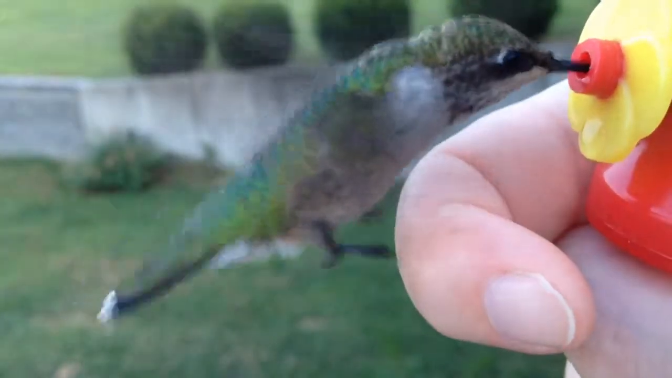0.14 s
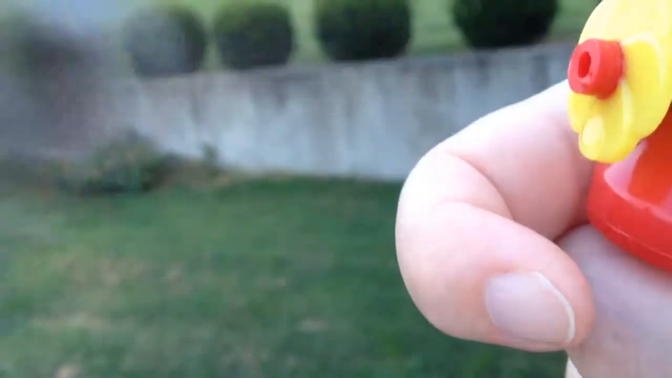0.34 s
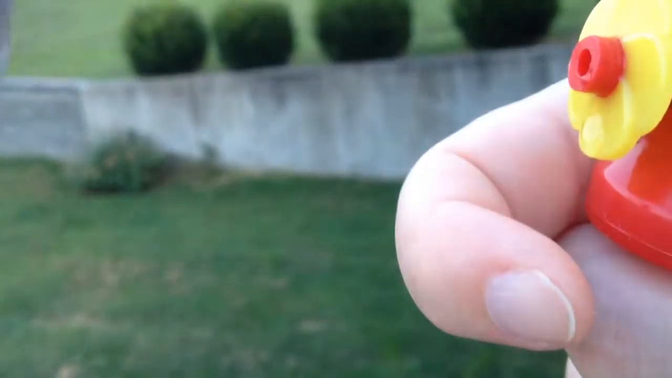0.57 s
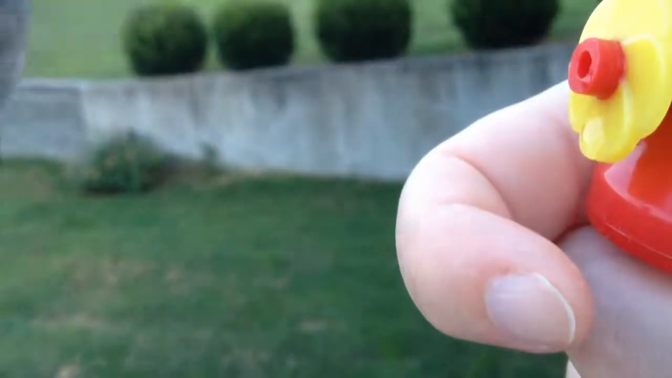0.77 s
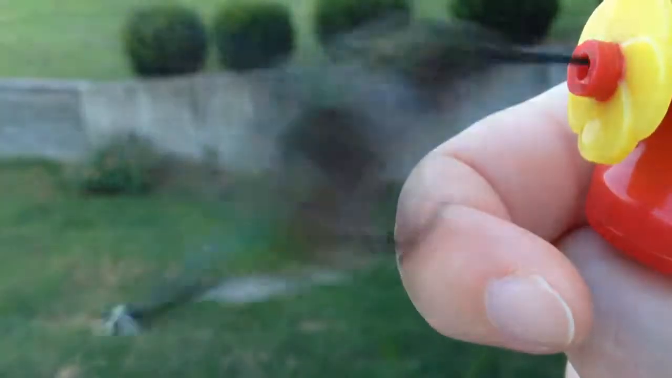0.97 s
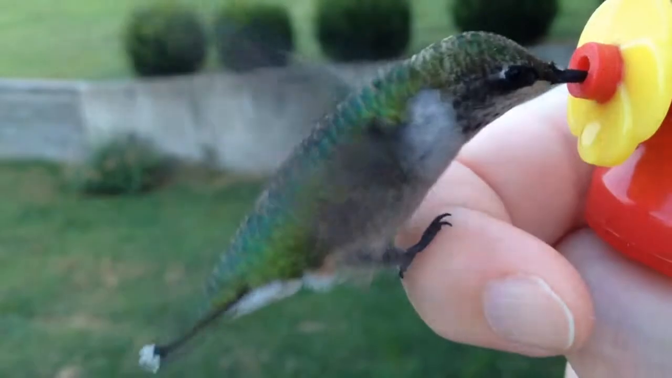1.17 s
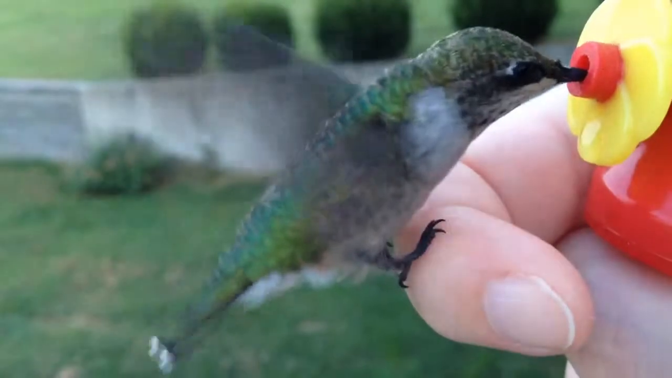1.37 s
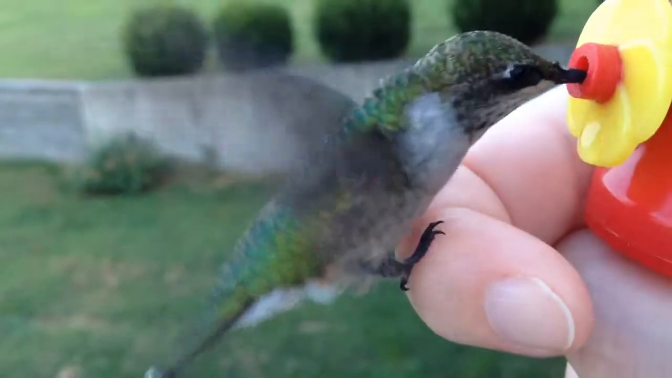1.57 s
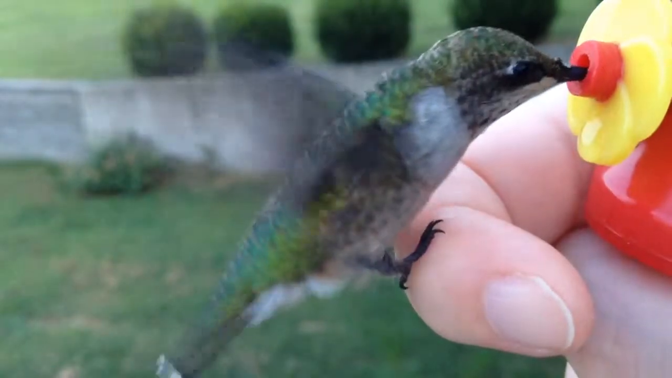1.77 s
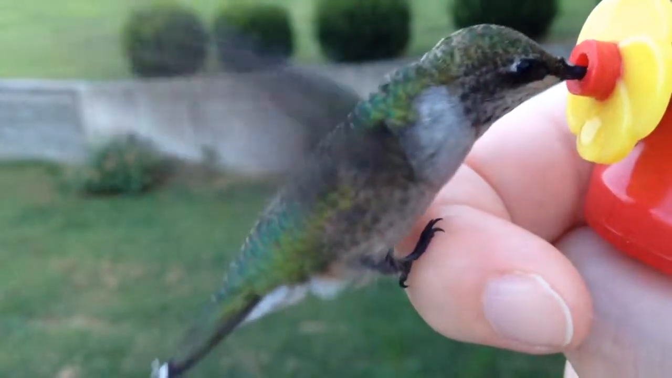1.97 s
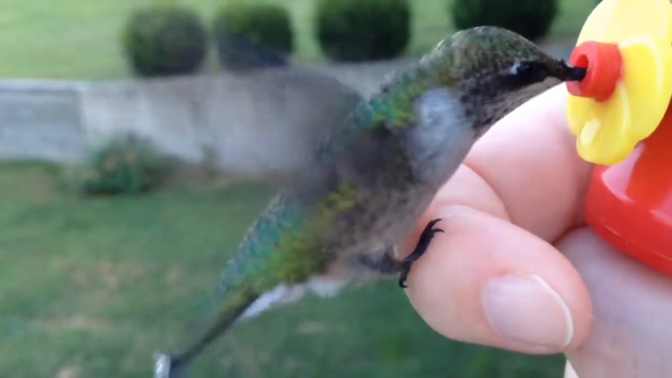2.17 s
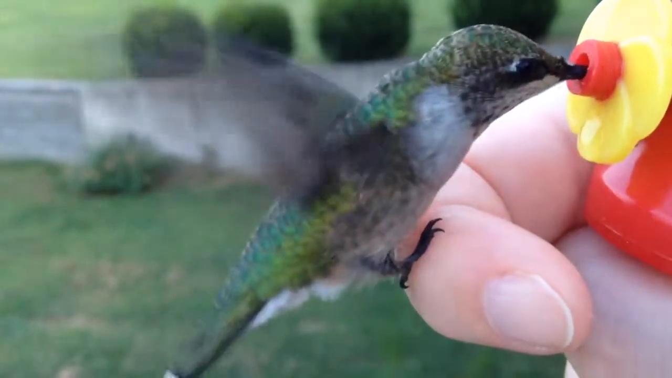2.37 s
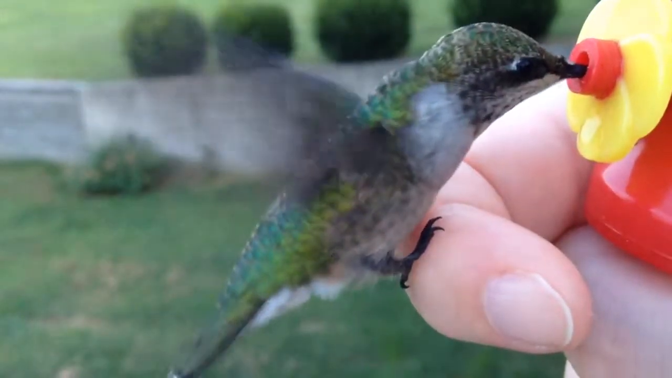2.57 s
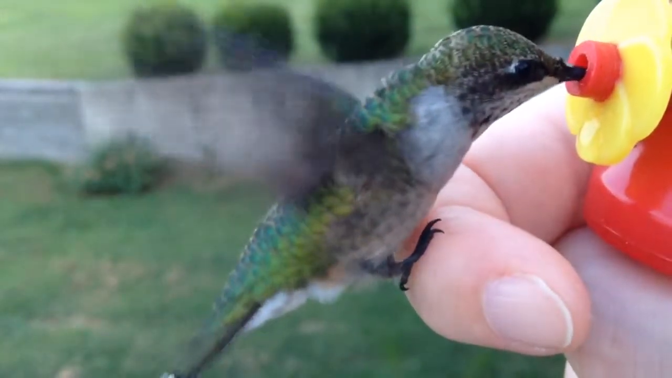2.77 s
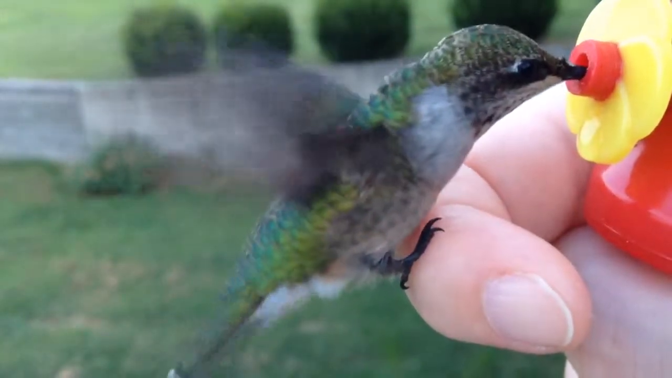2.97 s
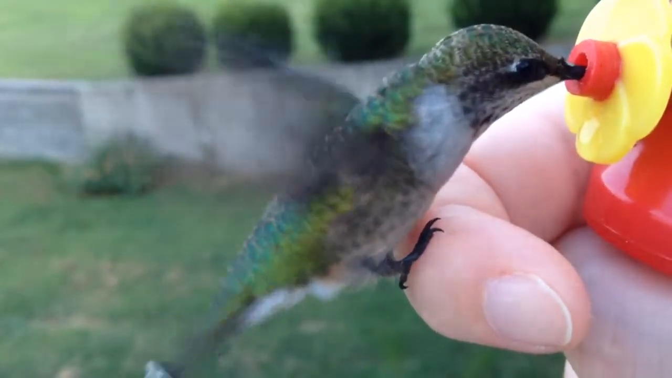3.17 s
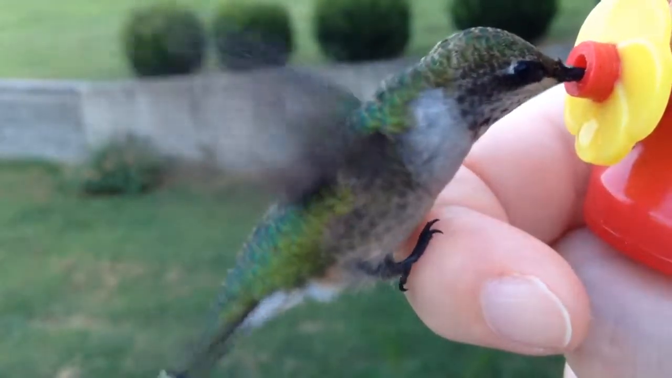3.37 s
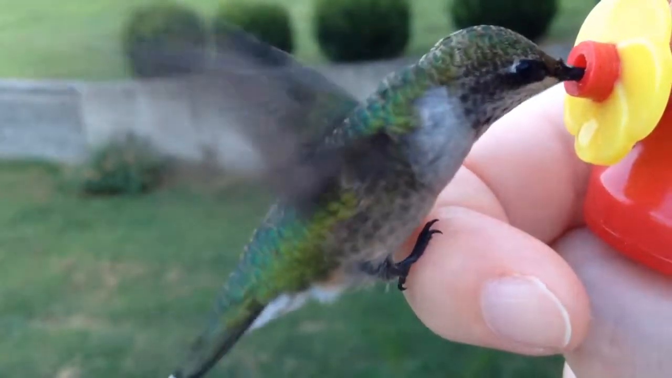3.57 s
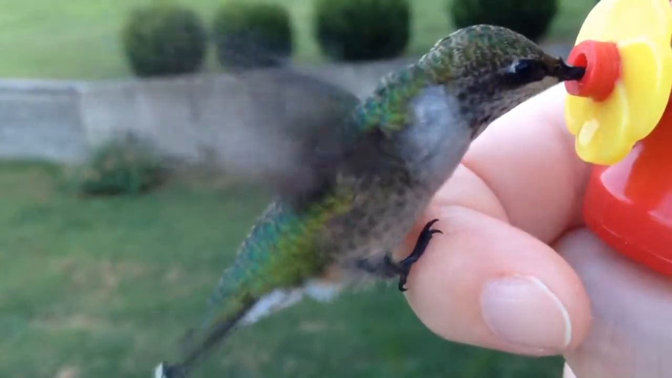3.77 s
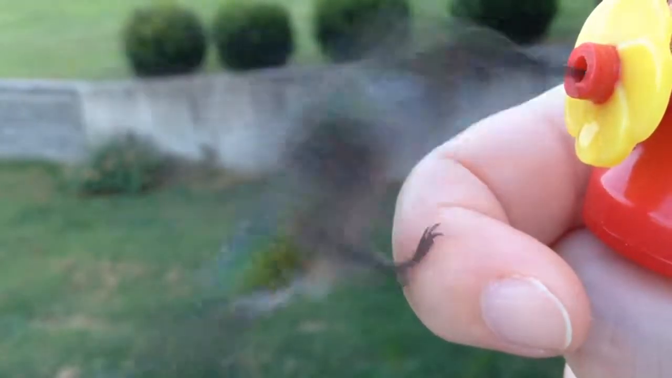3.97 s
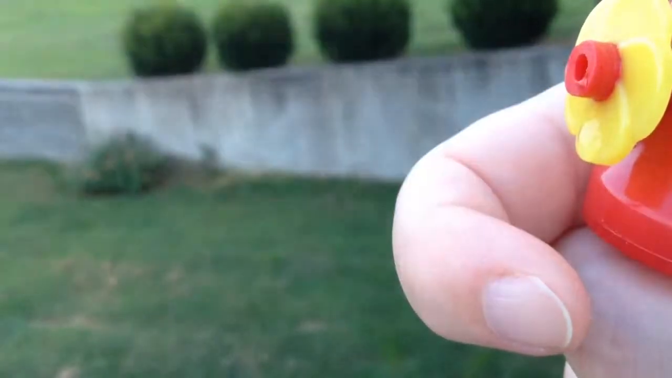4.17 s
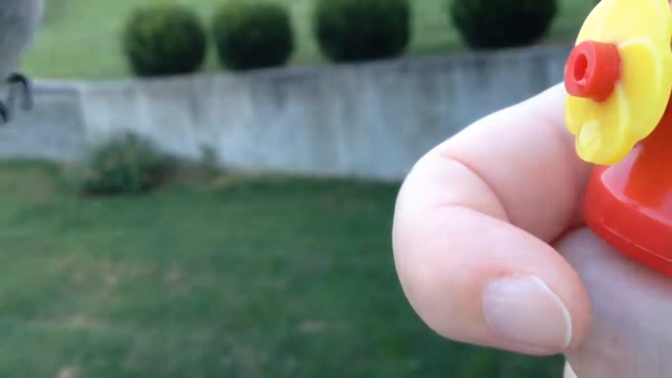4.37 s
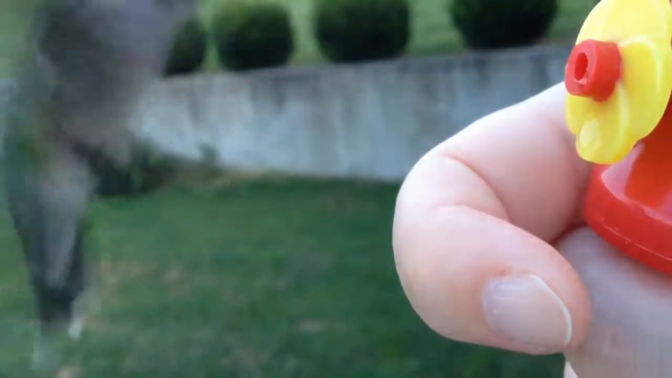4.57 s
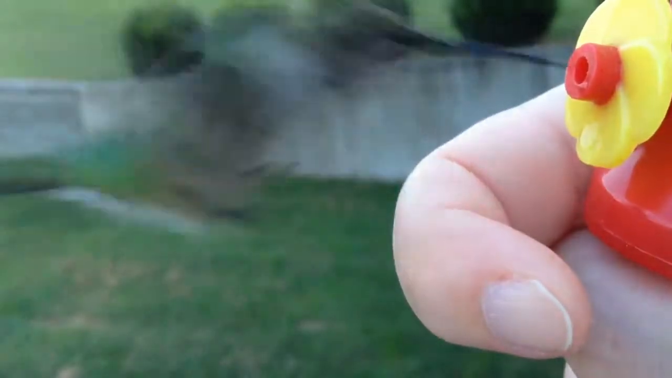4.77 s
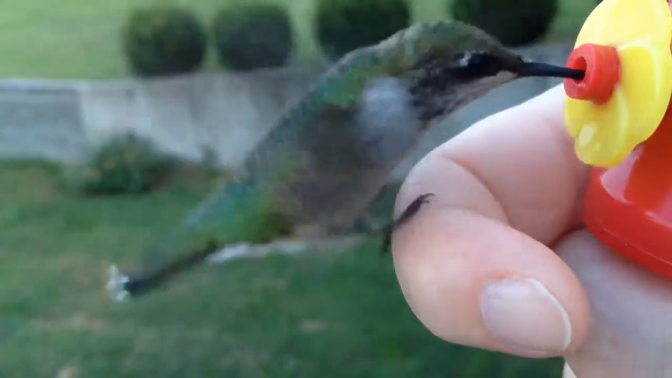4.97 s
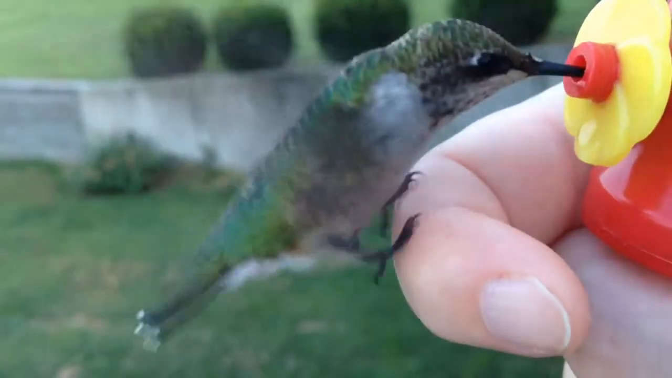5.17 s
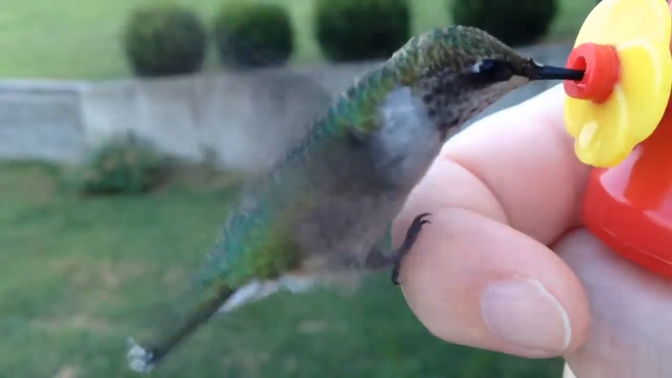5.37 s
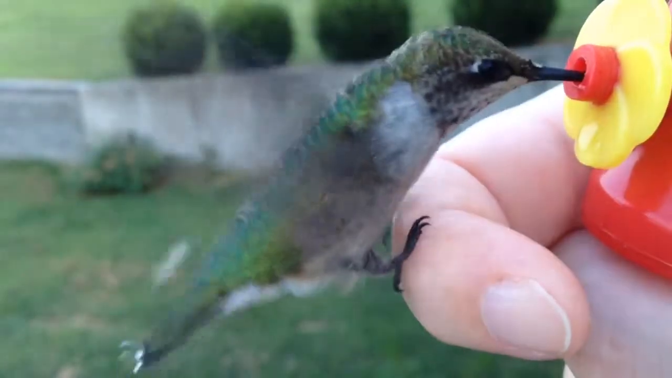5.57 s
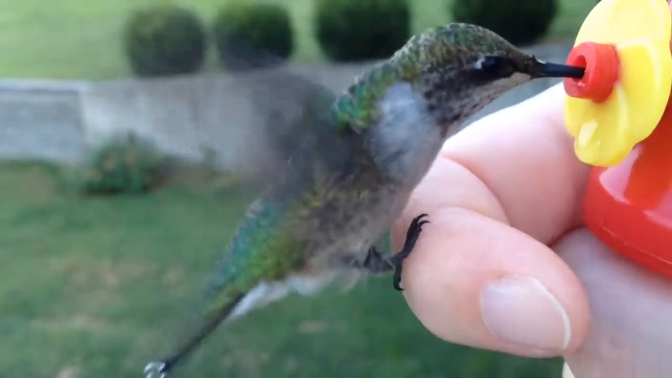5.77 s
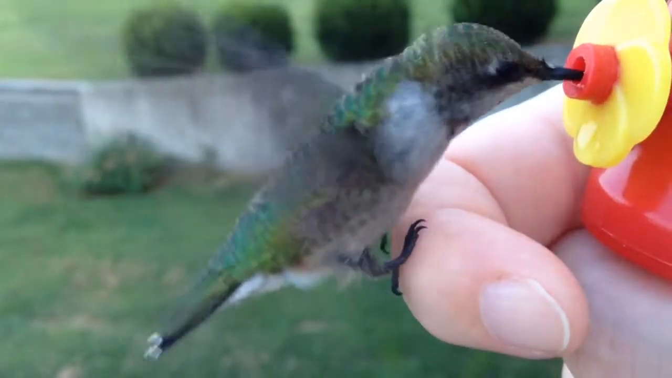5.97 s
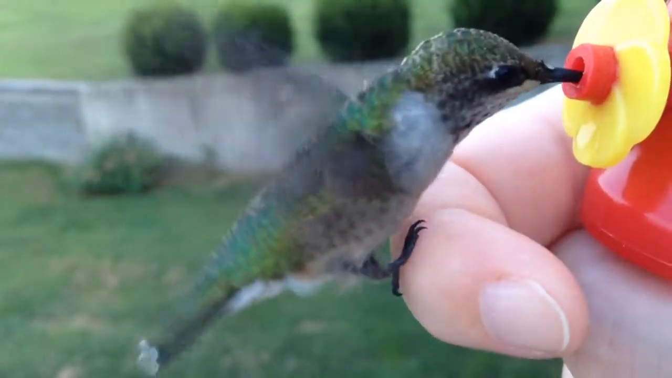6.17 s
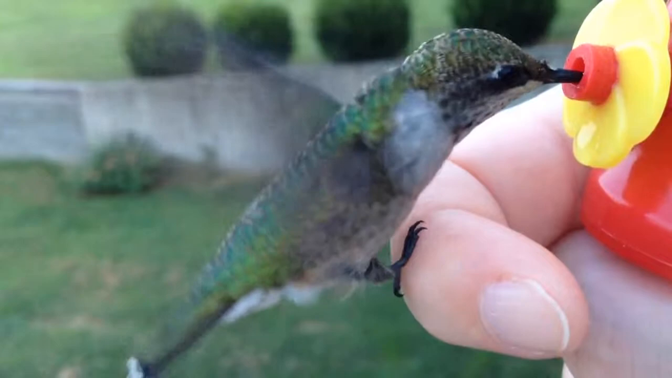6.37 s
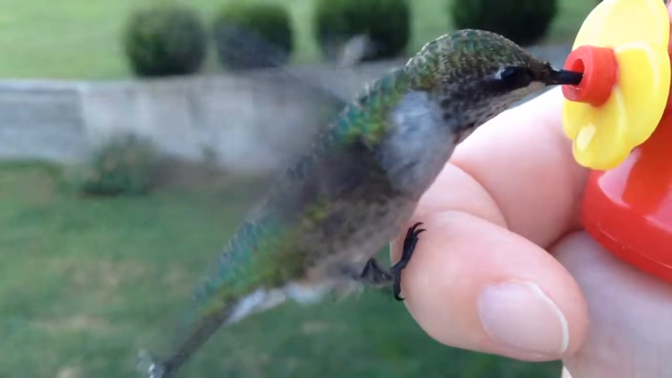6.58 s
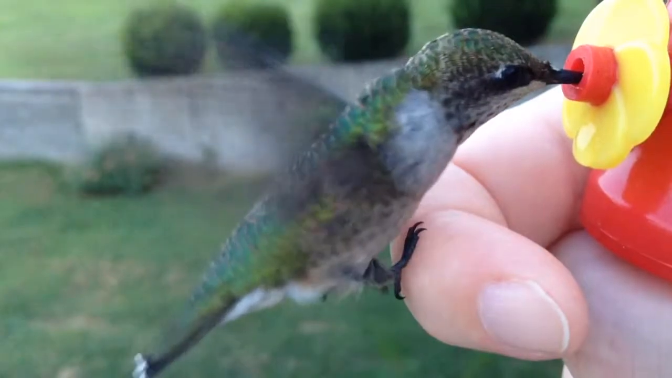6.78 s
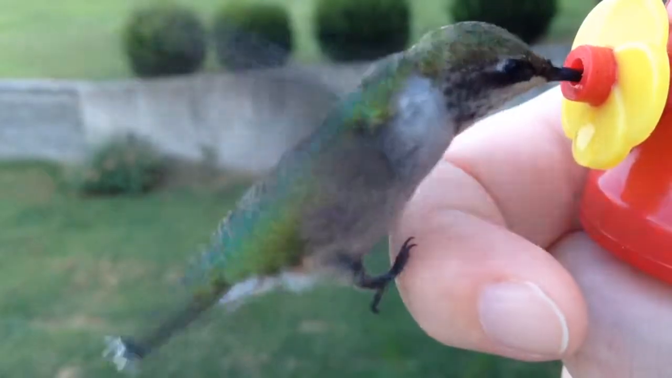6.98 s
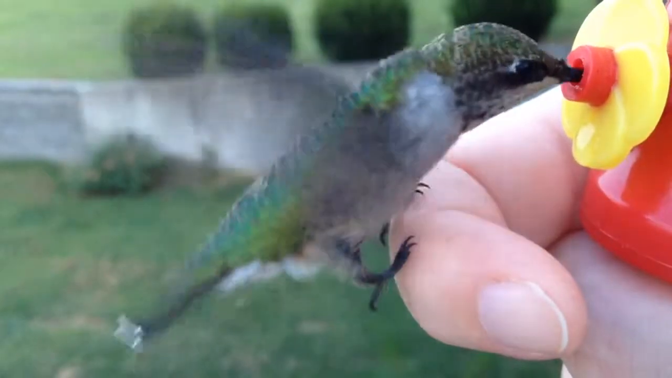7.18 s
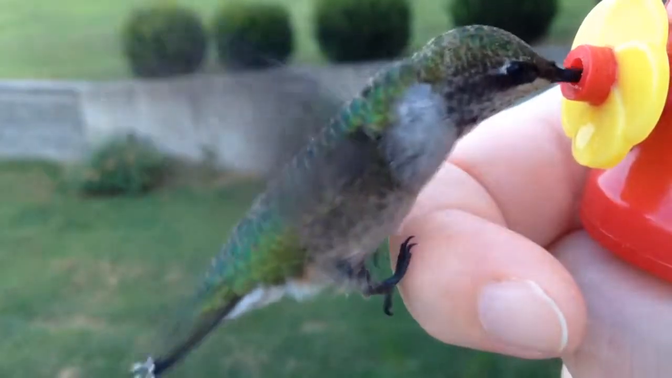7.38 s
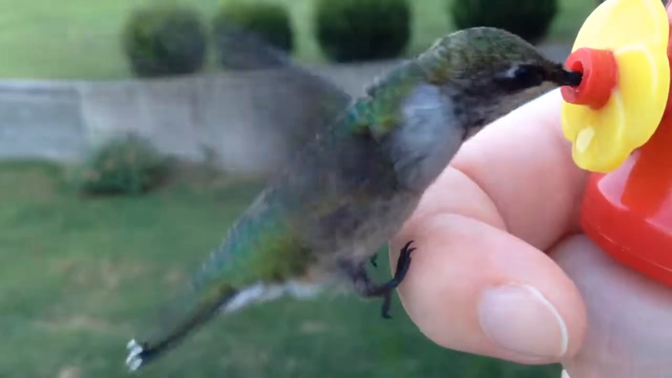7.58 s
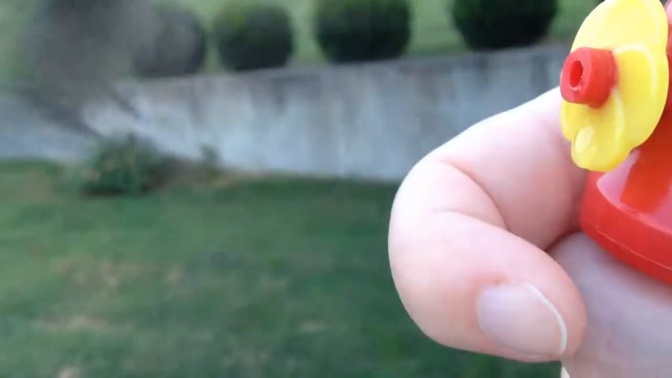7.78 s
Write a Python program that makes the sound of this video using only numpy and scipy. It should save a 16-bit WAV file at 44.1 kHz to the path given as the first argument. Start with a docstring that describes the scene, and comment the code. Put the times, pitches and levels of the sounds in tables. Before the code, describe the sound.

In a quiet garden, crickets and other insects chirr continuously: a steady rasping band and a higher one swelling about two and a half times a second. From very close, a hummingbird's wings start with a strong low hum near 55 beats a second, with puffs of air and feather rustle, surging at 0.3 and again at 1.0 seconds. From about 1.2 to 3.9 it sips, the hum reduced to a soft, uneven flutter with small surges. A light dry tick comes from the feeder at 3.8. At 4.1 the wings thrum hard as it darts off, dip, then surge back at 4.6 to 4.9 and hover until 5.3. Another soft flutter follows, restless around 7.0 to 7.2, then a departing burst at 7.75. Short falling chips with a brief echo cluster in the first 2.3 seconds and return faintly from 4.7, clearest at 6.9. A faint hollow note sounds at 5.4.

```python
"""A hummingbird hovers at a hand-held feeder, backs off, comes in and sips with its feet on a finger.
Halfway it darts off, swoops back and settles to sip again; at the very end it leaves.
Each wingbeat pushes out a pressure pulse, a puff of eddies and a rustle of feathers, heard from very close.
The hummingbirds' chips are short falling whistles with an echo; a few dry ticks come from the feeder.
Crickets and other night insects chirr throughout as pulsing bands of noise, over still air and a faint rush."""
import sys
import numpy as np
from scipy import signal
from scipy.fft import rfft, irfft
from scipy.io import wavfile

SR = 44100
rng = np.random.default_rng(int(sys.argv[2]) if len(sys.argv) > 2 else 0)


def store_wav(level_fs):
    """Save 16-bit WAV to argv[1]."""
    pcm = np.round(np.clip(np.atleast_2d(level_fs), -1, 1) * 32767)
    wavfile.write(sys.argv[1], SR, pcm.T.astype(np.int16))


N = 345744
TIME = np.arange(N) / SR  # seconds


def from_db(db):
    """Decibels to gain."""
    return 10 ** (np.asarray(db) / 20)


def rms_one(x):
    """Scale to unit rms."""
    return x / np.sqrt(np.mean(x ** 2) + 1e-20)


def in_time(rows):
    """Each column of a curve, interpolated at every sample."""
    seconds, *columns = np.transpose(rows)
    return [np.interp(TIME, seconds, column) for column in columns]


def drift(rate):
    """Smooth random wander of rms 1 that changes about rate times a second."""
    hz = np.arange(N // 2 + 1) * SR / N
    lowpass = 1 / (1 + (hz / rate) ** 4)
    return rms_one(irfft(rfft(rng.standard_normal(N)) * lowpass, N))


def noise(spectrum):
    """Noise of rms 1, its colour drawn between the spectrum's points on a log-frequency axis."""
    hz, db = np.transpose(spectrum)
    bins = np.arange(1, N // 2 + 2) * SR / N
    gain = from_db(np.interp(np.log(bins), np.log(hz), db, right=-90))
    return rms_one(irfft(rfft(rng.standard_normal(N)) * gain, N))


def resonance(x, hz, width_hz):
    """A two-pole resonance of gain 1."""
    r = np.exp(-np.pi * width_hz / SR)
    zeros = np.array([1, 0, -1]) * (1 - r * r) / 2
    poles = [1, -2 * r * np.cos(2 * np.pi * hz / SR), r * r]
    return signal.lfilter(zeros, poles, x + 1e-18)


def surges(rows):
    """A flat-topped rise in dB for each row of middle, length and height."""
    return sum(db * np.exp(-(2 * (TIME - s) / length) ** 4) for s, length, db in rows)


def during(start, end, ramp_s):
    """1 between two times, falling to 0 over a ramp on either side."""
    return np.clip(1 + np.minimum(TIME - start, end - TIME) / ramp_s, 0, 1)


# Colour of the air shed by the wings. Each row: frequency in Hz, relative density in dB per Hz.
EDDY_COLOUR = [(60, -33), (110, 0), (200, 6), (290, 3.5), (450, -4), (700, -16), (1200, -17.5),
               (2500, -24.5), (5000, -41)]
# Colour of the feathers' rustle. Each row: frequency in Hz, relative density in dB per Hz.
RUSTLE_COLOUR = [(700, -37), (1500, -7.5), (3000, 5.5), (7000, 10.5), (10000, 3), (12000, 1.5),
                 (15000, 5.5)]
# Tones of the hum. Each row: multiple of the beat, level in a hover in dB, dB per dB of hum,
# change when turned away in dB, share of a thrust that it takes.
HUM_TONES = [(1, -80, 1.15, 3, 0.1), (2, -47.5, 1.17, 0, 0), (3, -45.5, 1.14, 2.5, 0),
             (4, -47.5, 1.05, -6, 0.2), (5, -58, 0.76, 4.5, 0.05)]
# Sudden thrusts that throw extra air. Each row: middle in seconds, length in seconds, rise in dB.
AIR_THRUSTS = [(.34, 0.12, 4.5), (.58, 0.056, 1), (.7, .04, 3), (1.02, 0.077, 2), (4.09, 0.12, 5),
               (4.37, .16, 2.5), (4.64, 0.13, 2.5), (5.67, .1, 3.5), (7.77, 0.066, 4)]
# Air thrown by the wings: reference level in a hover (dB), dB per dB of hum, change when turned away (dB)
SWISH_DB, SWISH_FOLLOWS, SWISH_AWAY_DB = -58.5, 0.42, 2.5
# Feathers in flight: the same three settings
FEATHER_DB, FEATHER_FOLLOWS, FEATHER_AWAY_DB = -65, 0.98, 3.5
FEATHER_REST_DB = -71  # the feathers brush even in the lightest stroke


def wings():
    """Hum, thumps, eddies, feather flicks and rustle, all locked to the wingbeat and growing with its force."""
    beat_hz, force_db, away = flight()
    thrust_db = surges(AIR_THRUSTS)
    tones_db = []
    for multiple, db, follows, away_db, share in HUM_TONES:
        tones_db.append((multiple, db + follows * force_db + away_db * away + share * thrust_db))
    swish_db = SWISH_DB + SWISH_FOLLOWS * force_db + SWISH_AWAY_DB * away + thrust_db
    flying_feathers_db = FEATHER_DB + FEATHER_FOLLOWS * force_db + FEATHER_AWAY_DB * away
    feathers = np.hypot(from_db(FEATHER_REST_DB), from_db(flying_feathers_db))
    turns = np.cumsum(beat_hz * (1 + .005 * drift(18.6))) / SR  # wingbeats so far

    # strong strokes are even, the light ones of sipping are not
    hum = wing_tones(turns, tones_db, swish_db, shimmer_db=1.7 - 0.059 * force_db, buzz_shimmer_db=4.0)
    flips = wing_pulses(turns, delay=0.067, back_db=-0.5, jitter_s=0.0002, spread_db=2.0, hz=337, width_hz=334)
    flips = from_db(swish_db - 4.0) * flips

    # the eddies grow more slowly than the tones, so close flight sounds cleaner than sipping
    gusts = rms_one(0.37 + bursts(turns, 0.077, 0.84) + 0.86 * bursts(turns, 0.48, 1.2))
    eddies = from_db(0.68 * swish_db - 15.0) * gusts * noise(EDDY_COLOUR)

    # the feathers snap taut between two downstrokes
    flicks = wing_pulses(turns, delay=.68, back_db=-14, jitter_s=.0004, spread_db=5.5, hz=1260, width_hz=1350)
    flicks = from_db(swish_db - 16.5) * flicks

    brush = rms_one(1.3 + bursts(turns, 0.16, 16) + 0.26 * bursts(turns, .62, 7.1))
    rustle = feathers * from_db(6.0 + 1.5 * drift(160)) * brush * noise(RUSTLE_COLOUR)
    return hum + flips + eddies + flicks + rustle


# Hovers, backs off, comes in and settles. Each row: time in seconds, beats per second, hum in dB.
FLIGHT_IN = [(0, 58.2, -39), (.18, 56.4, -43), (.3, 58.6, -41), (.345, 56.5, -39.5), (.39, 50, -45.5),
             (.44, 50.2, -41.5), (.48, 50.2, -51.5), (.57, 52, -46), (.93, 49.2, -48), (1.02, 56, -41.5),
             (1.08, 54, -45), (1.16, 47.8, -59), (1.5, 46.3, -60.5)]
# Darts off, waits, swoops back, brakes, hovers and settles. Each row: the same three columns.
DART_AND_RETURN = [(4.015, 49.24, -56), (4.04, 54.03, -46.5), (4.085, 57.7, -39), (4.13, 52.3, -42.5),
                   (4.2, 51.3, -52), (4.31, 53.33, -48.5), (4.42, 51.99, -45), (4.57, 50.73, -54.5),
                   (4.61, 57.16, -42), (4.792, 51.8, -45.5), (4.899, 59.86, -39), (4.96, 49.97, -50),
                   (5.01, 54.67, -44.5), (5.22, 54.14, -45), (5.34, 50.77, -47), (5.39, 48.6, -54),
                   (5.7, 47.3, -56)]
# Leaves. Each row: the same three columns.
FLIGHT_OUT = [(7.711, 51.6, -56), (7.735, 55.1, -46.5), (7.765, 56.5, -41), (7.84, 49.47, -46)]
# It hangs back from the feeder, turned away. Each row: start in seconds, end in seconds.
TURNED_AWAY = [(.38, 0.96), (4.2, 4.57), (7.8, 7.9)]
# Flutters to keep its balance, beating harder and faster; the long one is a restless second sip.
# Each row: middle in seconds, length in seconds, rise in dB.
BALANCE_FLUTTERS = [(1.68, 0.078, 6), (3.4, 0.09, 3), (3.888, .1, 7), (5.97, 0.1593, 6), (6.44, 0.101, 4.5),
                    (6.6, 2.05, 2), (7.02, .16, 11), (7.17, .16, 13), (7.53, 0.071, 4)]
FLUTTER_HZ_PER_DB = 0.22
# Sipping with its feet on the finger: wingbeats per s and hum level, and how far each wanders (rms)
SIP_BEAT_HZ, SIP_WANDER_HZ = 47.42, 1.2
SIP_DB, SIP_WANDER_DB = -65.5, 1.3
SETTLE_S, TURN_S = 0.053, 0.047  # from sipping to flight and back; turning away and back
HOVER_DB = -41  # hum of a steady hover, to which the wing levels refer


def flight():
    """Beat rate in Hz, hum level in dB against a hover, and how far the bird is turned away (0-1)."""
    flutter_db = surges(BALANCE_FLUTTERS)
    beat_hz = SIP_BEAT_HZ + SIP_WANDER_HZ * drift(3) + FLUTTER_HZ_PER_DB * flutter_db
    hum_db = SIP_DB + SIP_WANDER_DB * drift(21) + flutter_db
    for path in (FLIGHT_IN, DART_AND_RETURN, FLIGHT_OUT):
        flying = during(path[0][0], path[-1][0], SETTLE_S)
        path_hz, path_db = in_time(path)
        beat_hz = beat_hz + flying * (path_hz - beat_hz)
        hum_db = hum_db + flying * (path_db - hum_db)
    away = sum(during(start, end, TURN_S) for start, end in TURNED_AWAY)
    return beat_hz, hum_db - HOVER_DB, away


# Buzz above the tones. Each row: multiple of the beat, level against the swish in dB.
BUZZ_TONES = [(6, -18.5), (7, -8), (8, -17.5), (9, -15), (10, -16.5), (11, -24), (12, -29.5)]


def wing_tones(turns, tones_db, swish_db, shimmer_db, buzz_shimmer_db):
    """Each downstroke pushes, then pulls the air: the harmonics line up in one lopsided pulse, never twice alike."""
    levels = [(multiple, db + shimmer_db * drift(19.4)) for multiple, db in tones_db]
    levels += [(multiple, swish_db + db + buzz_shimmer_db * drift(9.0)) for multiple, db in BUZZ_TONES]
    harmonics = sum(from_db(db) * np.sin(2 * np.pi * multiple * turns) for multiple, db in levels)
    return -np.sqrt(2) * harmonics


def wing_pulses(turns, delay, back_db, jitter_s, spread_db, hz, width_hz):
    """Two short, damped pulses a beat, half a beat apart, one weaker, as when the wing turns over at each end."""
    beats = np.arange(int(turns[-1]))
    clicks = np.zeros(N)
    for share, db in ((delay, 0), (delay + .5, back_db)):
        chance = rng.standard_normal((len(beats), 2))
        at = (np.interp(beats + share, turns, TIME) + jitter_s * chance[:, 0]) * SR
        at = np.clip(at.astype(int), 0, N - 1)
        clicks[at] += from_db(db + spread_db * chance[:, 1])
    damped = resonance(resonance(-clicks, hz, width_hz), hz, width_hz)
    return rms_one(damped)


def bursts(turns, at, sharpness):
    """One smooth swell per wingbeat, centred on the given share of the beat."""
    return np.exp(sharpness * (np.cos(2 * np.pi * (turns - at)) - 1))


# Chips of the hummingbirds. Each row: start in seconds, starting pitch in Hz, fall in octaves,
# peak in dB before roughening and echo.
CHIP_CALLS = [(0.036, 2400, .55, -58), (.261, 2560, 0.62, -49.5), (.669, 2380, 0.44, -52.5),
              (.772, 2580, .6, -54.5), (.8, 2310, 0.51, -50), (1.423, 2360, 0.83, -52.5),
              (2.011, 2240, 0.81, -56.5), (2.273, 2700, 0.62, -55.5), (4.686, 2014, 0.48, -61),
              (4.768, 1984, 0.33, -57.5), (4.854, 1978, 0.43, -62), (5.23, 1900, 0.41, -64),
              (5.726, 2100, 0.47, -63), (5.763, 1758, 0.37, -65), (5.852, 1958, 0.51, -66.5),
              (6.192, 2260, 0.6, -60), (6.216, 1970, 0.396, -61.5), (6.322, 1928, 0.65, -62),
              (6.415, 2010, 0.71, -67), (6.898, 2443, 0.55, -49), (7.009, 2033, 0.68, -63),
              (7.205, 1929, 0.44, -60.5), (7.554, 1890, .5, -64), (7.618, 1850, .5, -62.5),
              (7.704, 1900, 0.57, -61)]
CHIP_S = 0.0209
# A far, faint chip keeps most of its echo: echo of a chip of middling strength (dB), and dB per dB of chip
ECHO_DB, ECHO_FOLLOWS = -63.5, .25


def chips(rough):
    """Each chip is a whistle that drops steeply in pitch within a few hundredths of a second; the garden echoes it."""
    direct, scattered = np.zeros((2, N))
    u = np.linspace(0, 1, int(CHIP_S * SR))
    envelope = abs(np.sin(np.pi * u ** 0.76)) ** 0.96
    middling_db = np.mean([db for *_, db in CHIP_CALLS])
    for s, start_hz, octaves, db in CHIP_CALLS:
        phase = 2 * np.pi * np.cumsum(start_hz * 2 ** (-octaves * u)) / SR
        whistle = envelope * np.sin(phase)
        echo_db = ECHO_DB + ECHO_FOLLOWS * (db - middling_db)
        at = int(s * SR)
        direct[at:at + len(u)] += from_db(db) * whistle
        scattered[at:at + len(u)] += from_db(echo_db) * whistle
    return direct * (1 + rough * drift(330)) + garden(scattered, t60=0.17)


def garden(x, t60):
    """Walls and shrubs scatter a short, noisy tail that falls 60 dB in t60 seconds."""
    t = TIME[:SR // 2]
    tail = rng.standard_normal(len(t)) * from_db(-60 * t / t60)
    return signal.fftconvolve(x, tail / np.linalg.norm(tail))[:N]


# Light taps at the feeder. Each row: start in seconds, level in dB before the noise is halved.
FEEDER_TAPS = [(3.759, -44), (4.009, -59)]


def taps(hz, width_hz, decay_s):
    """Bill and claws touch the plastic with a dry tick: a fast-dying burst of resonant noise."""
    touch = 0
    for s, db in FEEDER_TAPS:
        touch = touch + from_db(db) * (TIME >= s) * np.exp(-abs(TIME - s) / decay_s)
    return touch * rms_one(resonance(rng.standard_normal(N), hz, width_hz)) / 2


# One faint, hollow note. Its values: middle in seconds, pitch in Hz,
# time from the middle down to 1/e in seconds, peak in dB.
HOLLOW_NOTE = (5.418, 645, .018, -60.5)


def soft_note(s, hz, length, db):
    """A short sine under a bell-shaped envelope."""
    return from_db(db) * np.exp(-((TIME - s) / length) ** 2) * np.sin(2 * np.pi * hz * TIME)


# Colour of the low singers. Each row: frequency in Hz, relative density in dB per Hz.
LOW_COLOUR = [(2400, -34), (2850, -21.5), (3150, -12.5), (3450, -6.5), (3800, -4), (4150, -1.5), (4400, -4),
              (4700, -1), (5200, -3.5), (5700, -6), (6500, -13), (8000, -20.5)]
# Colour of the high singers. Each row: frequency in Hz, relative density in dB per Hz.
HIGH_COLOUR = [(4300, -29), (5200, -7.5), (5800, -1.5), (6350, 2), (6900, -2.5), (7500, -8), (8200, -12),
               (9200, -17), (10500, -30), (13000, -17)]
# Strength of the high singers' swells. Each row: time in seconds, level in dB.
SWELL_LEVELS = [(0, -56), (2.3, -56), (3.1, -61.5), (4.75, -56.5), (5.5, -65), (6.8, -59.5), (7.84, -57)]
# A few uneven swells before the steady rhythm. Each entry: middle in seconds.
EARLY_SWELLS = [0.0, .33, .52, .83, 1.14]
RHYTHM_START_S, RHYTHM_PERIOD_S = 1.45, .411
HIGH_BED_DB, SWELL_WIDTH_S = -58.5, .1  # steady bed under the swells; middle to 1/e
LOW_DB, LOW_FADE_DB_PER_S = -51, .18  # level at the start and slow fading


def insects(waver_db):
    """A steady low chorus and a higher one that swells and sinks, soon in a regular rhythm."""
    low_db = LOW_DB - LOW_FADE_DB_PER_S * TIME + waver_db * drift(1.3)
    low = from_db(low_db) * trill(LOW_COLOUR, pulse_hz=63.9, wander=0.049, depth=0.12)
    times = [*EARLY_SWELLS, *np.arange(RHYTHM_START_S, TIME[-1], RHYTHM_PERIOD_S)]
    swell_shape = sum(np.exp(-((TIME - s) / SWELL_WIDTH_S) ** 2) for s in times)
    swells = from_db(in_time(SWELL_LEVELS)[0]) * swell_shape
    high_gain = np.hypot(from_db(HIGH_BED_DB), swells)
    high = high_gain * trill(HIGH_COLOUR, pulse_hz=61.1, wander=0.0776, depth=0.28)
    return low + high


def trill(song, pulse_hz, wander, depth):
    """Many insects rasp together as noise; the wing strokes of the nearest make the sound flutter."""
    turns = np.cumsum(pulse_hz * (1 + wander * drift(8.25))) / SR
    return rms_one(noise(song) * (1 + depth * np.sin(2 * np.pi * turns)))


# Colour of the still garden air. Each row: frequency in Hz, relative density in dB per Hz.
AIR_COLOUR = [(20, -31), (45, -34), (70, -11), (100, -1.5), (200, 11), (400, -7), (700, -5.5),
              (1100, -10.5), (1700, -27), (2600, -28), (6000, -12), (15000, -29)]
AIR_DB = -67.5
# Strength of a faint far-off rush. Each row: time in seconds, level in dB.
RUSH_LEVELS = [(0, -67.5), (1.2, -90), (3.8, -78), (4.7, -73), (5.3, -72), (5.55, -92), (5.72, -68),
               (5.9, -77.5), (7.84, -68)]
# Colour of the rush. Each row: frequency in Hz, relative density in dB per Hz.
RUSH_SPECTRUM = [(300, -15), (600, 8), (900, 4.5), (1300, 3.5), (1800, -1), (2800, -7)]


def background():
    """Still air as steady coloured noise, and a far-off rush of noise that comes and goes."""
    air = from_db(AIR_DB) * noise(AIR_COLOUR)
    rush = from_db(in_time(RUSH_LEVELS)[0]) * noise(RUSH_SPECTRUM)
    return air + rush


def scene():
    """Bird, hollow note, insects and background, the same in both channels."""
    bird = wings() + chips(rough=0.41) + taps(hz=1595, width_hz=2420, decay_s=0.0012)
    mono = bird + soft_note(*HOLLOW_NOTE) + insects(waver_db=0.22) + background()
    return np.stack([mono, mono])


CUTOFF_HZ = 15350


def record(dry):
    """A brief fade-in of 8 ms; the top is cut steeply."""
    opened = dry * np.minimum(TIME / .008, 1)
    steep_lowpass = signal.ellip(12, .1, 70, CUTOFF_HZ, fs=SR, output="sos")
    return signal.sosfilt(steep_lowpass, opened)


dry = scene()
out = record(dry)
store_wav(out)
```